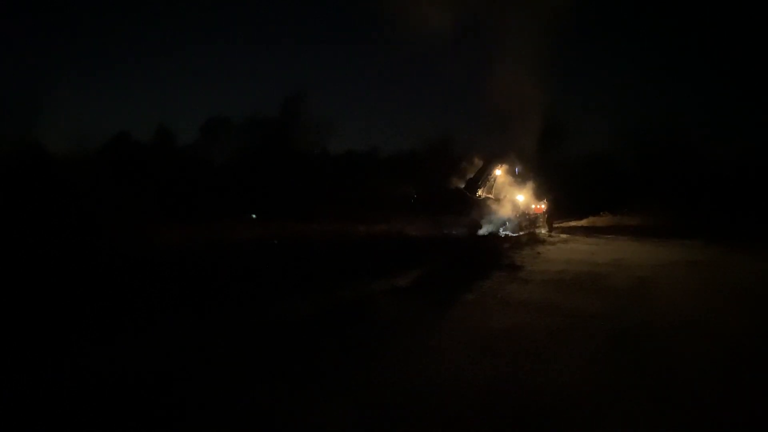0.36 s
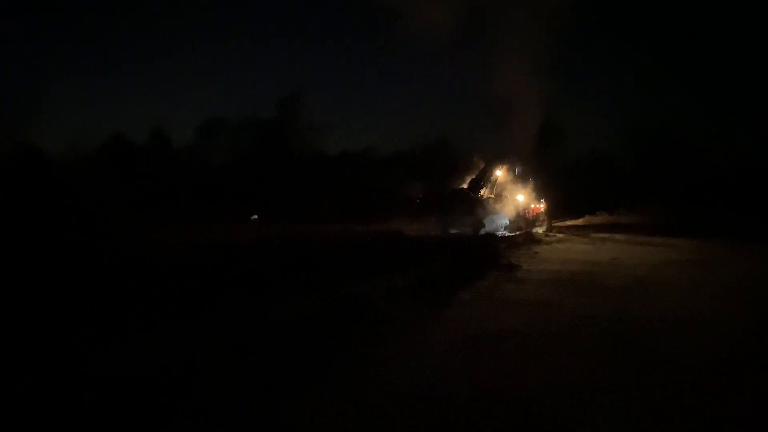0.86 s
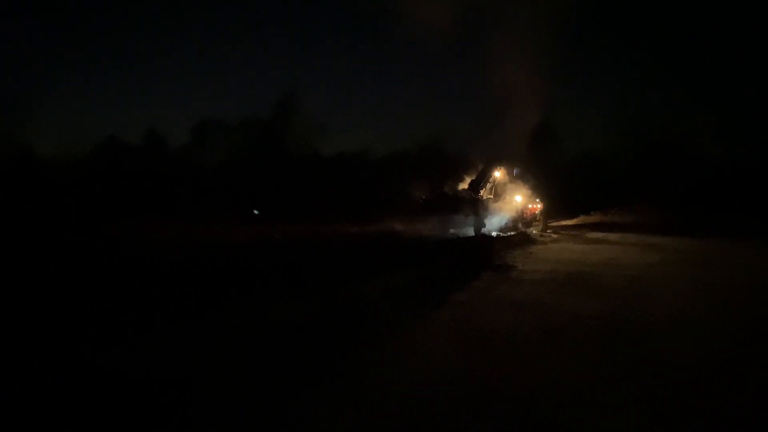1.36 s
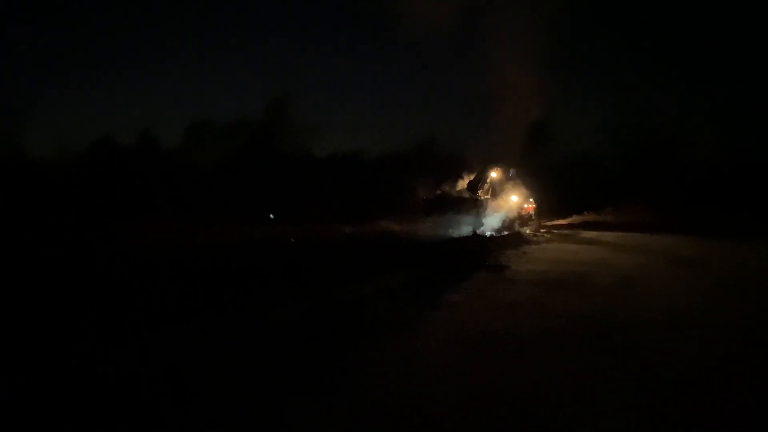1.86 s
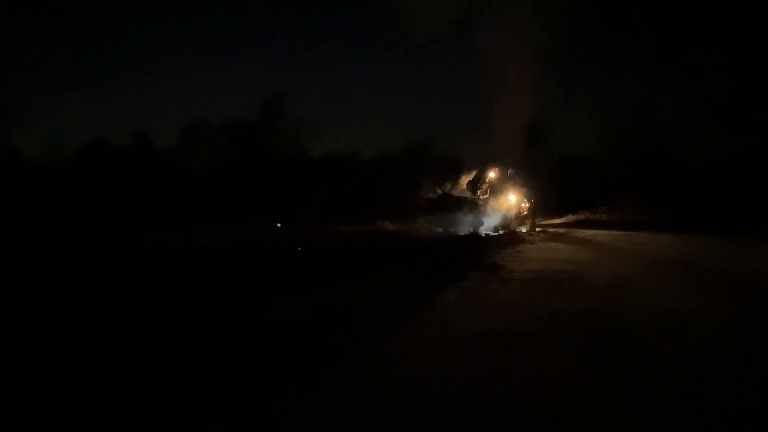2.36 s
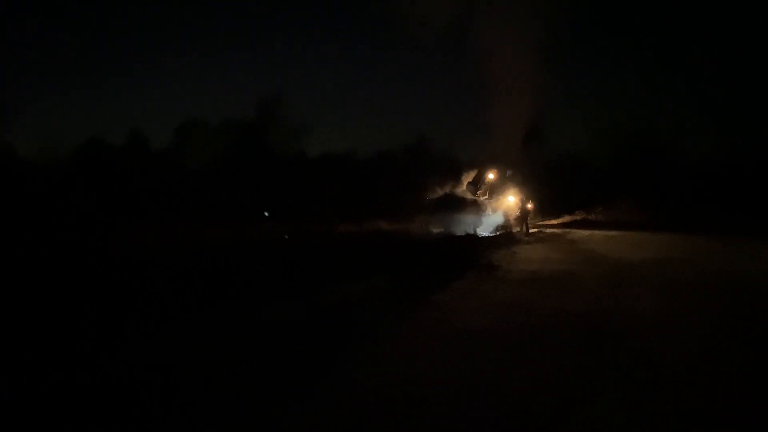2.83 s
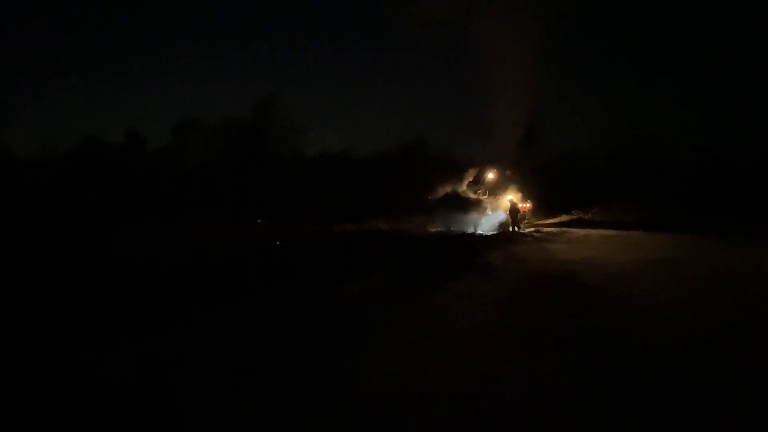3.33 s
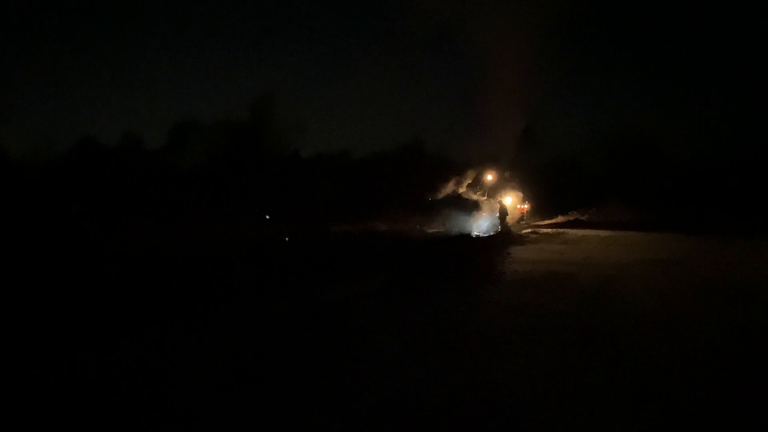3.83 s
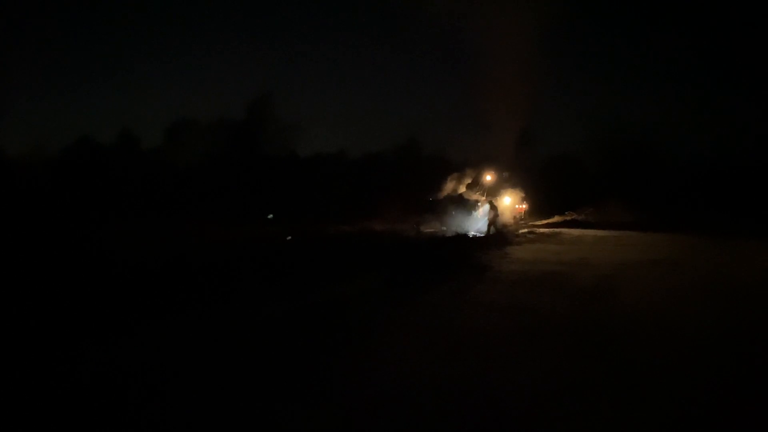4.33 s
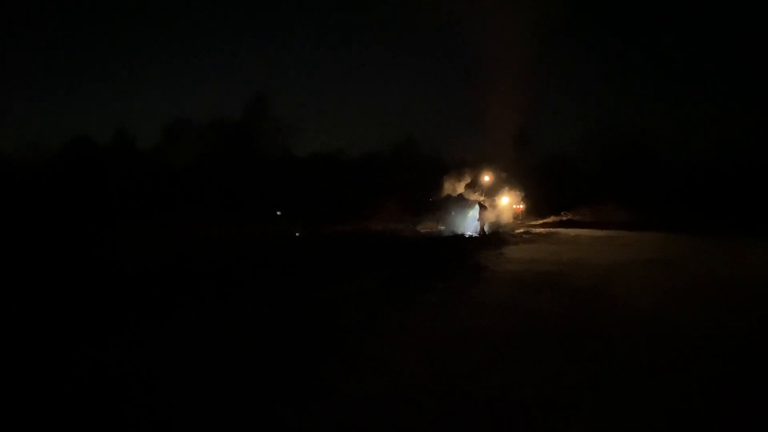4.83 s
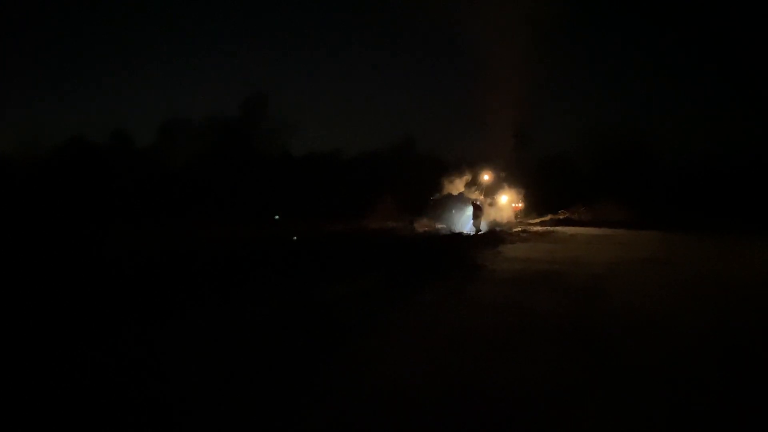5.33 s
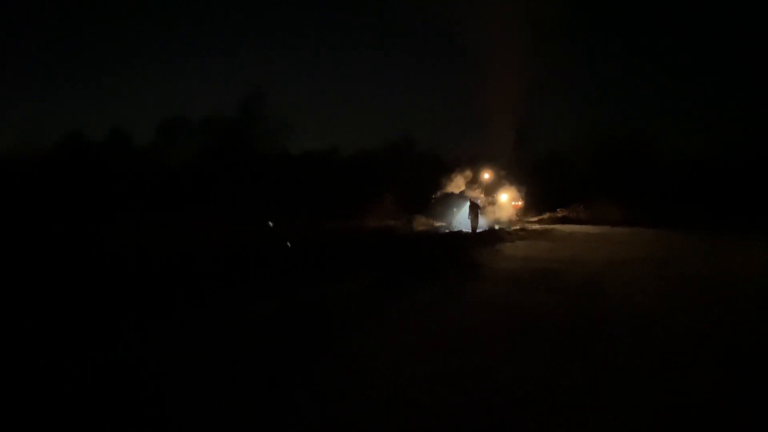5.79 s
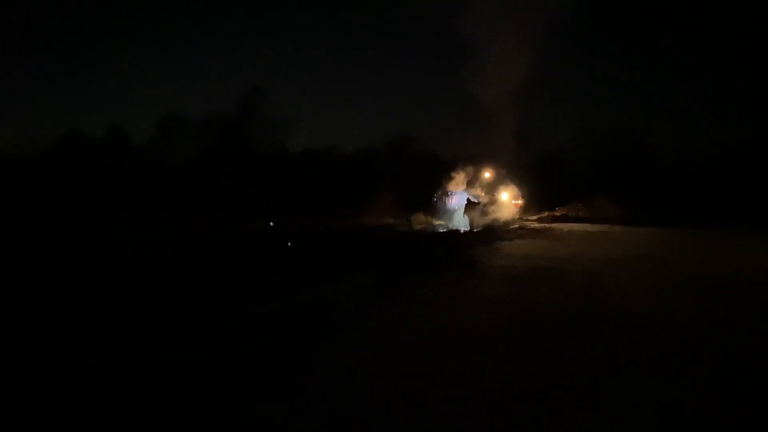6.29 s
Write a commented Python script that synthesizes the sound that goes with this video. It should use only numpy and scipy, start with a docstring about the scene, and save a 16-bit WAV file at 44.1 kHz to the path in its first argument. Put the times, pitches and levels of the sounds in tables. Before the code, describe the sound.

At night a distant steam locomotive roars low and hisses steadily, slowly fading, with faint pump clanks, until wind thumps the microphone hard.

```python
"""A railway at night: a steam locomotive creeps away, far from a phone with two microphone ports.
Its fire roars as filtered noise with a chimney boom; four steam leaks hiss in higher noise bands.
A low hum and faint whines are wavering sines; a pump clanks with struck modes and puffs noise.
Gusts of low noise and sagging thuds buffet the phone, hardest near the end."""
import sys
import numpy as np
from scipy import signal
from scipy.fft import rfft, irfft, next_fast_len
from scipy.io import wavfile
from scipy.ndimage import uniform_filter1d

SR = 44100
rng = np.random.default_rng(int(sys.argv[2]) if len(sys.argv) > 2 else 0)


def transcribe(u):
    """Save the signal u as a 16-bit wav file named by the first command-line argument.

    u: samples, shape (n,) or (channels, n), limited to [-1, 1]; the rate is SR.
    q: integer samples, one column per channel.
    """
    v = np.clip(np.atleast_2d(u).T, -1, 1)
    q = np.round(v * 32767).astype(np.int16)
    wavfile.write(sys.argv[1], SR, q)


def attenuation_scalar(level_db):
    """Turn a level in dB into a linear amplitude multiplier (20 dB per decade)."""
    decades = np.asarray(level_db, float) / 20
    return 10 ** decades


N = 294134
T = np.arange(N) / SR  # time in seconds
M = next_fast_len(N)  # length of the spectra
F = np.maximum(np.arange(M // 2 + 1) * SR / M, 1)  # frequency in Hz


def curves(table):
    """Columns of a table, drawn as straight lines over time."""
    s, *columns = np.transpose(table)
    return [np.interp(T, s, c) for c in columns]


def over_hz(table):
    """Columns of a table, drawn over the spectrum on a logarithmic pitch scale."""
    hz, *columns = np.transpose(table)
    return np.array([np.interp(np.log(F), np.log(hz), c) for c in columns])


def unit(x):
    """Scale a signal to an rms of 1."""
    return x / np.sqrt(np.mean(x ** 2))


def walk(rate):
    """Random levels held for 1 / rate seconds, then smoothed twice; rms near 1."""
    hold = int(SR / rate)
    steps = np.repeat(rng.standard_normal(N // hold + 1), hold)
    smooth = uniform_filter1d(uniform_filter1d(steps, hold), hold)
    return unit(smooth[:N])


def evened(x):
    """Noise with its chance swells partly levelled out."""
    seconds, share = 0.17, 0.74
    power = uniform_filter1d(np.mean(x ** 2, axis=0), size=int(seconds * SR))
    return unit(x / power ** (share / 2))


def resonant(modes):
    """Gain over the spectrum: 1, plus a hump at each mode."""
    return 1 + sum(attenuation_scalar(db) / (1 + ((F - hz) * 2 / width) ** 2) for hz, width, db in modes)


# How a far sound differs between the two ports.
# Each row: frequency in Hz, likeness from 0 to 1, lead of the right port in radians.
PORT_LIKENESS = [(60.5, 1, 0.2), (310, 0.96, 0.35), (624, 0.29, 2), (1350, 0.92, 2), (1850, 0, 0.5),
                 (2050, 0.92, 0.37), (2490, 0.96, 0.5), (2730, 0.94, -1), (3150, 0.78, 0.7),
                 (4110, 0.6, 1.5), (5050, 0.34, 3.5), (5290, 0.87, 3), (5450, 0.26, 7), (6650, 0.82, 7),
                 (7270, 0.67, 7.5), (9160, 1, 9.5), (11300, 0.93, 13), (13500, .95, 15.7), (15200, 0.8, 20)]


def at_ports(x):
    """Spectrum of a far sound at both ports: the right one leads, and scattered sound makes them unlike."""
    like, lead = over_hz(PORT_LIKENESS)
    like = np.clip(like, 0, 1)
    direct, scattered = rfft(x, M)
    right = like * direct * np.exp(1j * lead) + np.sqrt(1 - like ** 2) * scattered
    return np.array([direct, right])


def patchy(spectrum, lo_hz, hi_hz, slow_db, quick_db, quick_rate):
    """Third-octave bands between two soft edges, each wandering slowly and flickering on its own."""
    centres = np.arange(np.log2(lo_hz) + 1 / 6, np.log2(hi_hz), 1 / 3)
    out = 0
    for c in centres:
        window = np.cos(np.pi / 2 * np.clip(3 * (np.log2(F) - c), -1, 1)) ** 2
        band = irfft(spectrum * window, M)[:, :N]
        out = out + attenuation_scalar(slow_db * walk(1.72) + quick_db * walk(quick_rate)) * band
    return unit(out)


def drifting_band(table, width_hz):
    """A band of hiss whose centre drifts: slow noise carried up to a moving pitch."""
    hz, db = curves(table)
    low_pass = 1 / (1 + (2 * F / width_hz) ** 4)
    slow = irfft(rfft(rng.standard_normal((4, N)), M) * low_pass, M)[:, :N]
    phase = 2 * np.pi * np.cumsum(hz * (1 + 0.012 * walk(5))) / SR
    band = slow[:2] * np.cos(phase) + slow[2:] * np.sin(phase)
    return attenuation_scalar(db + 1.4 * walk(10)) * unit(irfft(at_ports(band), M)[:, :N])


def tone(hz, waver):
    """A thin tone of rms near 1 whose level and pitch waver."""
    phase = 2 * np.pi * np.cumsum(hz * (1 + waver * walk(20))) / SR
    return np.sqrt(2) * attenuation_scalar(3.5 * walk(16)) * np.sin(phase)


def ring(hz, t60, attack, sag=0., sag_s=1.):
    """One struck mode dying by 60 dB in t60 seconds; it may start higher by a share and sag to its pitch."""
    t = T[:SR // 2]
    turns = hz * (t + sag * sag_s * (1 - np.exp(-t / sag_s)))
    return np.sin(2 * np.pi * turns) * np.exp(-np.log(1000) * t / t60) * (1 - np.exp(-t / attack))


def add(track, s, sound):
    """Mix a sound into a track at a time in seconds."""
    i = int(s * SR)
    track[..., i:i + sound.shape[-1]] += sound[..., :N - i]


# Colour of the fire's noise. Each row: frequency in Hz, relative level in dB per Hz.
ROAR_COLOUR = [(15, -45), (25, -20), (54, 2.5), (75, 3.5), (102, -2.5), (176, -9), (205, -9), (236, -11.5),
               (270, -11), (315, -13.5), (430, -26.5), (700, -34), (910, -76), (1540, -120)]
# Chimney resonances. Each row: frequency in Hz, width in Hz, height of the hump in dB.
CHIMNEY_MODES = [(71.56, 11, 8.5), (204.6, 13, -14.5)]
# Bass balance of the ports. Each row: frequency in Hz, right over left in dB.
RIGHT_BASS = [(60, 0), (250, 2.5), (500, 0.5)]
# Deepest rumble. Each row: time in seconds, level in dB.
DEEP_LEVEL = [(0, -37), (1, -45), (2, -43), (3.3, -45), (4.3, -38.5), (5, -52), (5.8, -42), (6.67, -56)]
# Chimney boom. Each row: time in seconds, level in dB.
BOOM_LEVEL = [(0, -27), (.25, -35.5), (.52, -34), (.7, -37), (1.35, -35), (1.45, -28.5), (1.6, -30.5),
              (1.75, -35), (2.08, -40.5), (2.35, -32.5), (2.45, -38.5), (2.53, -30.5), (2.6, -39.5),
              (2.72, -32.5), (2.85, -37), (3.0, -29.5), (3.1, -39), (3.17, -25.5), (3.27, -42.5),
              (3.5, -35), (3.57, -35), (3.68, -29.5), (3.8, -42.5), (4.03, -39.5), (4.11, -29.5),
              (4.18, -40.5), (4.37, -35), (4.55, -42.5), (4.72, -38), (4.97, -43.5), (5.08, -33.5),
              (5.44, -44.5), (5.8, -36), (6.67, -41)]
# The roar, sinking as the engine draws away. Each row: time in seconds, level in dB.
ROAR_FADE = [(0, -34), (1, -34), (1.9, -35.5), (2.4, -37), (3.7, -38.5), (4.1, -41), (4.5, -44),
             (5.2, -42.5), (6.67, -46)]


def fire():
    """Turbulent draught, with the chimney picking out a boom and an overtone."""
    deep_top_hz = 54.9
    spectrum = at_ports(rng.standard_normal((2, N))) * attenuation_scalar(over_hz(ROAR_COLOUR)) * resonant(CHIMNEY_MODES)
    spectrum[1] *= attenuation_scalar(over_hz(RIGHT_BASS)[0])
    deep = patchy(spectrum, 21.8, deep_top_hz, slow_db=1.5, quick_db=0.5, quick_rate=6)
    boom = patchy(spectrum, deep_top_hz, 112, slow_db=1.5, quick_db=0.5, quick_rate=11)
    roar = patchy(spectrum, 108, 800, slow_db=0.54, quick_db=1.5, quick_rate=18)
    throb_db = 0.85 * walk(9)
    out = attenuation_scalar(curves(BOOM_LEVEL)[0] + throb_db) * evened(boom)
    out = out + attenuation_scalar(curves(DEEP_LEVEL)[0]) * evened(deep)
    return out + attenuation_scalar(curves(ROAR_FADE)[0]) * roar


# Colour of the hiss. Each row: frequency in Hz, relative level left and right in dB per Hz.
HISS_COLOUR = [(350, 1, -3.5), (610, -5, -5.5), (1110, -3, -3), (1990, -6, -7.5), (2510, -7.5, -6.5),
               (3020, -8, -13), (4070, -8.5, -9.5), (4220, -12.5, -13.5), (5160, -5.5, -3),
               (5450, -11, -8.5), (5950, -11.5, -3), (7380, -7.5, -11), (8580, -17, -17.5),
               (11240, -23.5, -22.5), (14000, -31, -31.5), (15300, -36, -33), (15900, -60, -60)]
# Nozzle resonances. Each row: frequency in Hz, width in Hz, height of the hump in dB.
NOZZLE_MODES = [(2260, 320, -6), (3370, 150, 2.5)]
# The blower, lowest of the jets. Each row: time in seconds, level in dB.
BLOWER_LEVEL = [(0, -46.5), (1.5, -48.5), (2.7, -48.5), (3.5, -48), (4.1, -48), (4.65, -51), (5.3, -50),
                (5.8, -52), (6.67, -52)]
# The valve leak. Each row: time in seconds, level in dB.
VALVE_LEVEL = [(0, -49), (1, -50), (1.8, -49.5), (2.65, -51.5), (3.5, -50), (3.85, -52.5), (4.3, -50),
               (4.8, -52), (5.5, -53), (6.67, -54)]
# The two high jets swell and sink. Each row: time in seconds, drain cock in dB, fine leak in dB.
HIGH_JET_LEVELS = [(0, -52.5, -54), (.85, -51.5, -53), (1.1, -51.5, -56), (1.5, -51, -52),
                   (1.95, -52.5, -54.5), (2.5, -55, -57), (3.1, -50.5, -56.5), (3.45, -56, -61),
                   (4.05, -58, -59), (4.25, -54, -57), (4.65, -56, -58.5), (5.4, -56, -61.5),
                   (6.05, -56, -60), (6.28, -56, -55.5), (6.67, -56.5, -61.5)]
# A drifting band in the drain cock's hiss. Each row: time in seconds, centre in Hz, level in dB.
COCK_DRIFT = [(0, 5950, -64), (.3, 6000, -56), (.6, 6200, -81), (1.3, 6020, -59), (1.8, 6050, -55),
              (2.6, 6140, -60.5), (3.0, 6280, -55.5), (3.3, 6230, -57.5), (3.6, 6230, -53),
              (3.9, 6230, -58.5), (4.1, 6250, -61.5), (4.35, 6250, -56.5), (4.65, 6230, -62),
              (4.9, 6470, -58), (5.4, 6540, -57), (5.8, 6500, -59.5), (6.2, 6400, -71), (6.67, 6300, -76)]
# A drifting band in the blower's hiss. Each row: time in seconds, centre in Hz, level in dB.
BLOWER_DRIFT = [(0, 1545, -62), (.6, 1550, -60), (1.4, 1506, -61), (1.8, 1514, -62), (2.6, 1512, -60),
                (3.5, 1500, -56), (4.0, 1490, -54.5), (4.2, 1518, -58), (4.5, 1490, -56),
                (5.5, 1486, -57.5), (6.67, 1507, -57.5)]


def steam():
    """Four jets of turbulent steam: the smaller the opening, the higher it hisses."""
    blower_top_hz, valve_top_hz, cock_top_hz = 1788, 4450, 8210
    spectrum = at_ports(rng.standard_normal((2, N))) * attenuation_scalar(over_hz(HISS_COLOUR)) * resonant(NOZZLE_MODES)
    blower = patchy(spectrum, 350, blower_top_hz, slow_db=0.4, quick_db=0.8, quick_rate=7)
    valve = patchy(spectrum, blower_top_hz, valve_top_hz, slow_db=0.5, quick_db=1.7, quick_rate=6)
    cock = patchy(spectrum, valve_top_hz, cock_top_hz, slow_db=0.4, quick_db=1.3, quick_rate=6)
    leak = patchy(spectrum, cock_top_hz, 17000, slow_db=0.4, quick_db=1, quick_rate=9)
    cock_db, leak_db = curves(HIGH_JET_LEVELS)
    out = attenuation_scalar(curves(BLOWER_LEVEL)[0]) * blower + attenuation_scalar(curves(VALVE_LEVEL)[0]) * valve
    out = out + attenuation_scalar(cock_db) * cock + attenuation_scalar(leak_db) * leak
    return out + drifting_band(COCK_DRIFT, width_hz=960) + drifting_band(BLOWER_DRIFT, width_hz=114)


def hum():
    """A low wavering tone throughout, slowly fading."""
    start_db, fade_db_per_s = -53, 0.8
    return attenuation_scalar(start_db - fade_db_per_s * T) * tone(303.5, waver=0.00595)


# Faint whines. Each row: start in seconds, length in seconds, pitch in Hz, level in dB.
WHINE_NOTES = [(.8, 0.49, 1287, -64), (1.399, 0.5, 856, -61.5), (2.426, .5, 1276, -63.5),
               (2.601, 0.51, 862, -60.5), (3.198, 0.56, 1292, -63), (3.3, 0.55, 1250, -71),
               (4.098, 0.883, 860, -64.5), (4.297, 1.4, 1284, -66), (4.901, 1.67, 1234, -72.5),
               (5.9, 0.55, 1290, -72)]


def whines():
    """Wavering tones that fade in, hold and fade out."""
    edge_s = 0.13
    out = np.zeros(N)
    for s, length, hz, db in WHINE_NOTES:
        fade = np.clip(np.minimum(T - s, s + length - T) / edge_s, 0, 1)
        out = out + attenuation_scalar(db) * fade * tone(hz, waver=0.00328)
    return out


# Pump strokes. Each row: time in seconds, peak of the main ring in dB, peak of the side rings in dB,
# puff in dB, rise of the puff in seconds.
STROKES = [(1.592, -46.5, -54, -49.5, 0.051), (1.719, -40, -51, -54, 0.063), (2.19, -62, -43, -55, 0.049),
           (3.2297, -46.5, -46, -47.5, 0.049), (3.985, -56, -52, -49.5, .025),
           (4.108, -47, -50, -53, 0.046), (4.148, -60, -47, -54.5, .05), (5.1796, -52, -48, -50.5, .075)]
# Modes of the pump casting, the main one first. Each row: pitch in Hz, relative level in dB,
# time to die by 60 dB in seconds.
CASTING_MODES = [(1024, 0, .23), (1048, -3, .1), (860, -1, .15), (1170, -1, .1), (1700, -5, .12),
                 (2250, -4, .08), (2830, -3, .08)]


def pump():
    """Each stroke rattles the casting for a moment, exciting its modes, and lets out a soft puff."""
    puff_hz, puff_width_hz, rattle_s = 1300, 2500, 0.018
    out, puffs, t = np.zeros((2, N)), np.zeros(N), T[:SR // 2]
    main, *others = [attenuation_scalar(db) * ring(hz, t60, 0.0052) for hz, db, t60 in CASTING_MODES]
    # cubed noise is spiky, like many small knocks
    rattles = rng.standard_normal((len(STROKES), SR // 5)) ** 3 * np.exp(-T[:SR // 5] / rattle_s)
    band = 1 / (1 + ((F - puff_hz ** 2 / F) / puff_width_hz) ** 2)
    hiss = irfft(at_ports(rng.standard_normal((2, N))) * band, M)[:, :N]
    for (s, main_db, side_db, puff_db, rise), rattle in zip(STROKES, rattles):
        for db, modes in ((main_db, main), (side_db, sum(others))):
            clank = signal.fftconvolve(modes, rattle)
            add(out, s, attenuation_scalar(db) * clank / np.abs(clank).max())
        swell = np.e * t / rise * np.exp(-t / rise)  # reaches 1 after the rise
        add(puffs, s - rise / 2, attenuation_scalar(puff_db) * swell)
    return out + puffs * attenuation_scalar(1.2 * walk(90)) * unit(hiss)


# Three gusts, one list each. Each row: time in seconds, level in dB.
GUSTS = [
    [(4.17, -47), (4.205, -31.5), (4.25, -33), (4.3, -39.5), (4.4, -53)],
    [(5.74, -37), (5.86, -39), (5.9, -34), (6.14, -34), (6.24, -26), (6.3, -32), (6.4, -24), (6.46, -30.5),
     (6.51, -48), (6.62, -35), (6.67, -55)],
    [(6.45, -47), (6.56, -47), (6.625, -44), (6.65, -61)],
]
# Colour of each gust, one list each. Each row: frequency in Hz, relative level in dB per Hz.
GUST_COLOURS = [
    [(30, -28), (90, -7), (180, 0.5), (300, -9), (570, -19), (720, -30), (1500, -55), (2500, -70)],
    [(15, -48), (30, -15), (60, -0.5), (100, -1.5), (177, -7), (400, -33), (600, -58), (1100, -90)],
    [(60, -18), (200, 4), (350, 2), (600, -9), (800, -36), (1500, -55)],
]
# One number per gust: strength of the part opposite at the two ports, against the shared part (ratio).
GUST_DIFFERENCE = (.5, .33, .55)


def wind():
    """Low turbulence pressing on the ports, partly alike and partly opposite."""
    out = 0
    for gust, colour, unlike in zip(GUSTS, GUST_COLOURS, GUST_DIFFERENCE):
        mid, side = rfft(rng.standard_normal((2, N)), M) * attenuation_scalar(over_hz(colour))
        both = mid + unlike * side * np.array([[1], [-1]])
        eddies = evened(irfft(both, M)[:, :N])
        blowing = uniform_filter1d(1. * (T > gust[0][0]) * (T < gust[-1][0]), size=SR // 25)
        out = out + blowing * attenuation_scalar(curves(gust)[0] + 0.64 * walk(40)) * eddies
    return out


# Slaps of wind. Each row: time in seconds, deep blow in dB, pitch of the blow in Hz, smack in dB.
SLAPS = [(5.879, -6, 79, -20), (5.917, -11, 70.4, -36), (5.964, -18, 86, -16.5), (5.987, -35, 110, -25),
         (6.004, -10, 95.5, -31), (6.037, -14, 75, -31), (6.079, -11.5, 97, -41), (6.1, -13, 66, -42),
         (6.133, -15.5, 190.7, -29), (6.157, -11, 126, -38), (6.171, -7, 95, -42), (6.213, -7.5, 99, -47),
         (6.245, -6, 114, -25), (6.273, -15, 96, -38), (6.305, -30, 90, -24), (6.319, -13, 78.5, -28),
         (6.348, -10, 94, -25), (6.362, -5.5, 89, -36), (6.379, -7, 126, -39), (6.394, -7, 83.4, -25),
         (6.424, -9, 80, -37), (6.45, -16, 66, -28), (6.474, -30, 90, -29), (6.52, -30, 85, -37),
         (6.555, -25, 80, -23), (6.592, -22, 84, -27), (6.617, -24, 84, -20)]


def thuds():
    """Single eddies slap the phone: a short smack with a deep blow, nearly the same at both ports."""
    out = np.zeros((2, N))
    for s, db, hz, smack_db in SLAPS:
        t60 = 0.075 * (90 / hz) ** 0.73  # 0.075 s at 90 Hz; higher blows die sooner
        blow = ring(hz, t60, attack=0.0077, sag=0.56, sag_s=0.0071)
        smack = ring(238, 0.037, attack=0.0033, sag=0.45, sag_s=0.005)
        # weights for the left and right port
        add(out, s, attenuation_scalar(db) * blow * np.array([[1], [0.9]]))
        add(out, s, attenuation_scalar(smack_db) * smack * np.array([[1], [0.7]]))
    return out


def scene():
    """All sources as they reach the two ports."""
    return fire() + steam() + hum() + whines() + pump() + wind() + thuds()


def roll_off(x):
    """The treble ends steeply here."""
    return signal.sosfilt(signal.butter(12, 16470, fs=SR, output="sos"), x)


def record(dry):
    """The phone's microphones lose the deepest bass."""
    low_cut = signal.butter(2, 40.7, "high", fs=SR, output="sos")  # corner in Hz
    heard = signal.sosfilt(low_cut, dry)
    return roll_off(heard)


dry = scene()
out = record(dry)
transcribe(out)
```